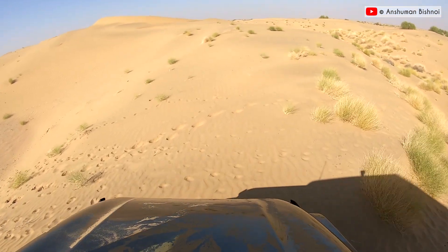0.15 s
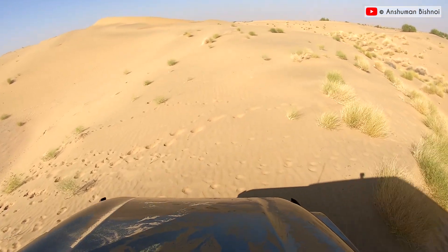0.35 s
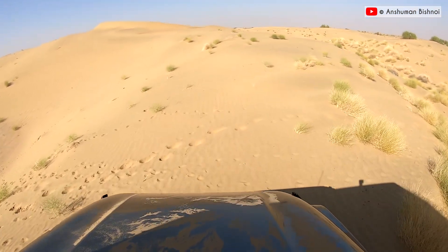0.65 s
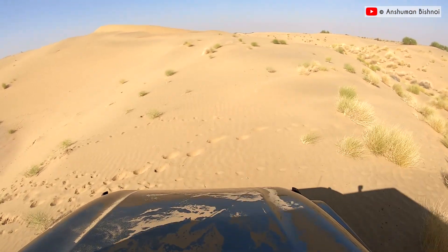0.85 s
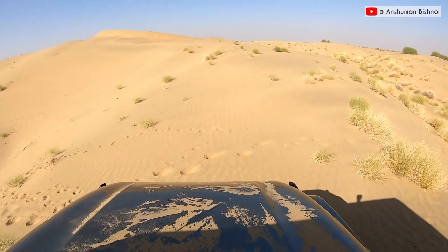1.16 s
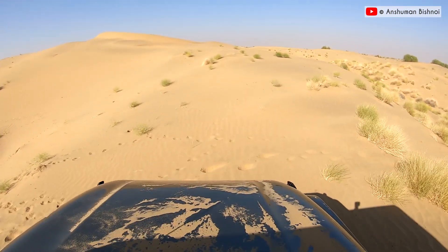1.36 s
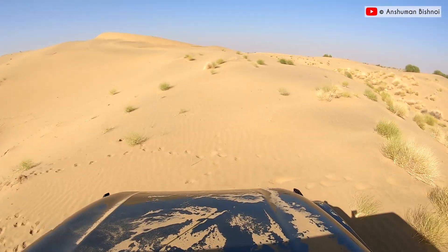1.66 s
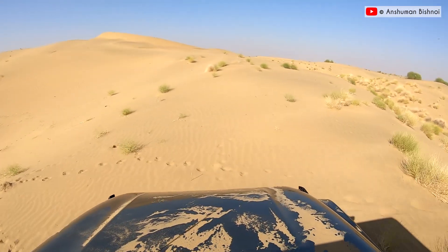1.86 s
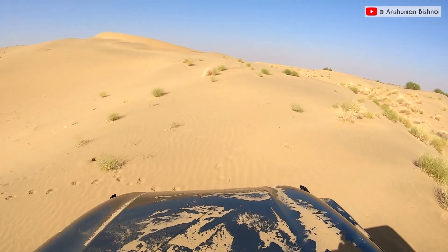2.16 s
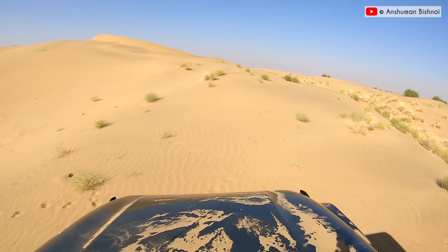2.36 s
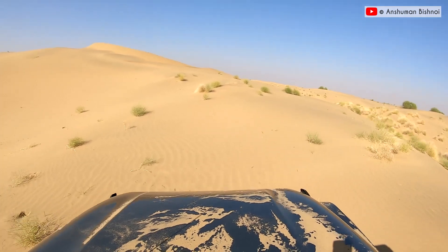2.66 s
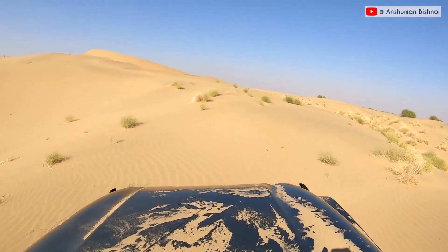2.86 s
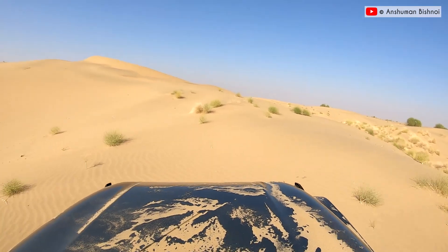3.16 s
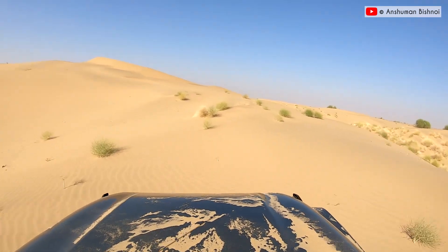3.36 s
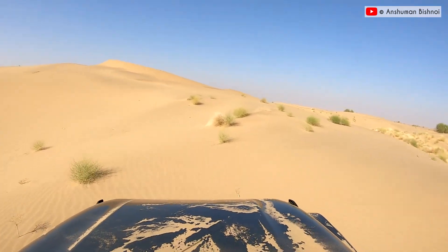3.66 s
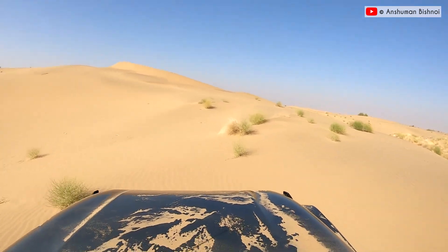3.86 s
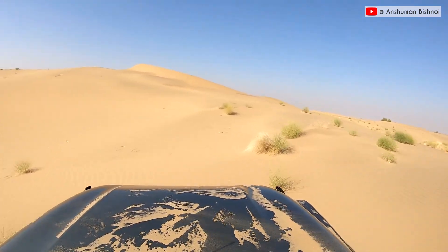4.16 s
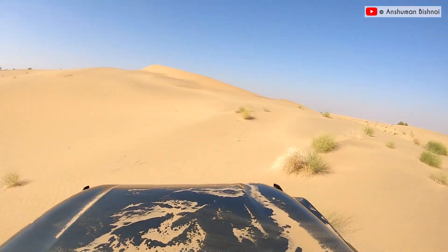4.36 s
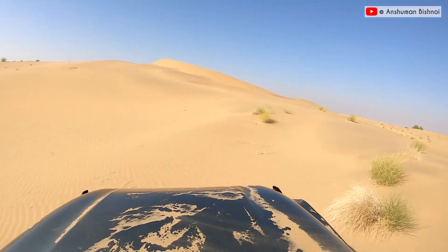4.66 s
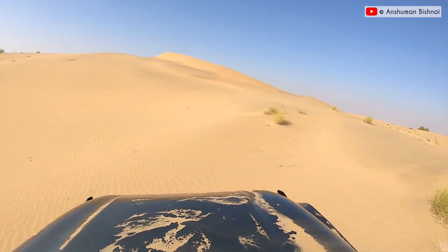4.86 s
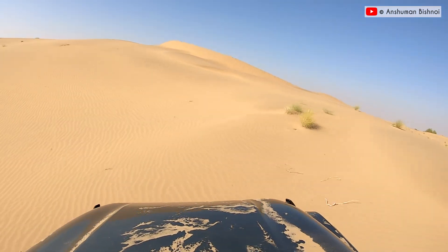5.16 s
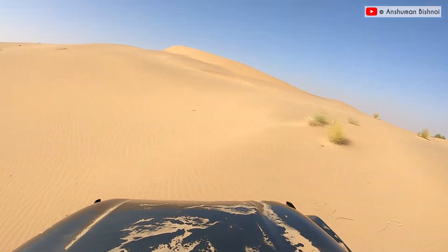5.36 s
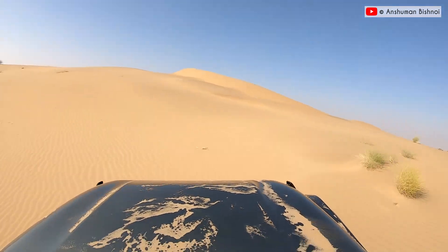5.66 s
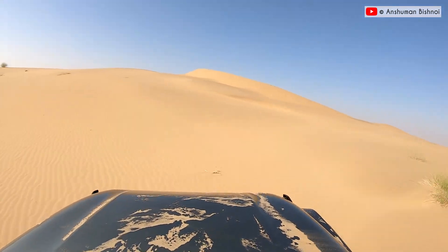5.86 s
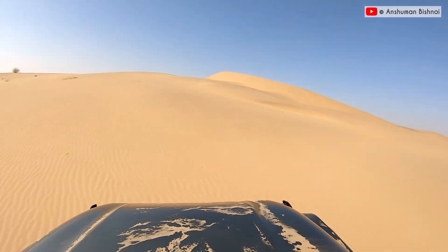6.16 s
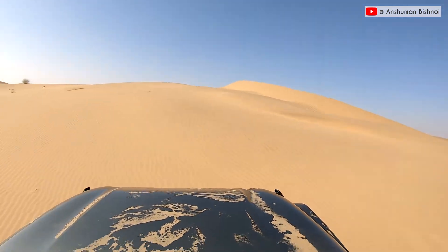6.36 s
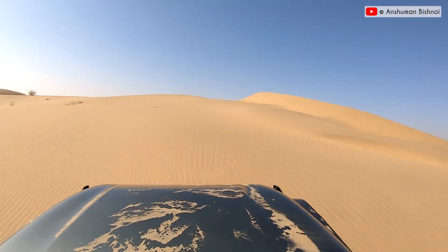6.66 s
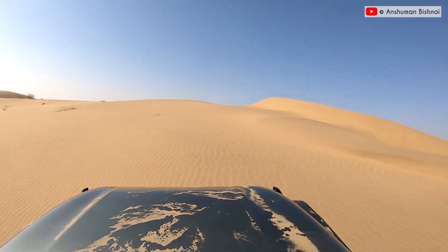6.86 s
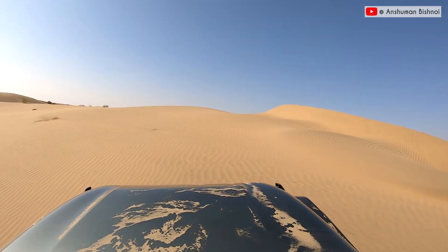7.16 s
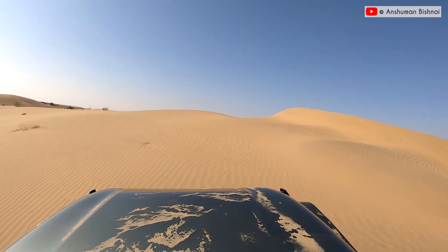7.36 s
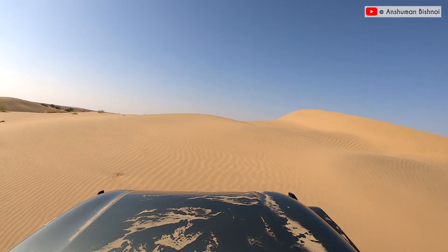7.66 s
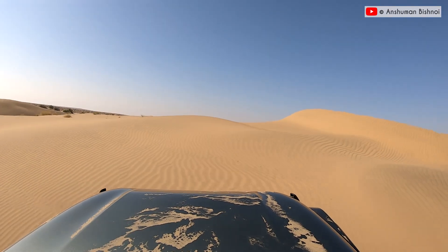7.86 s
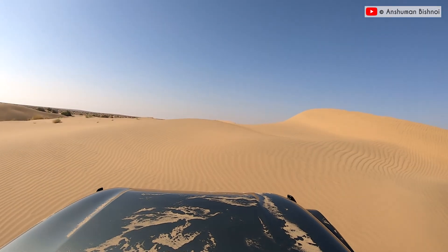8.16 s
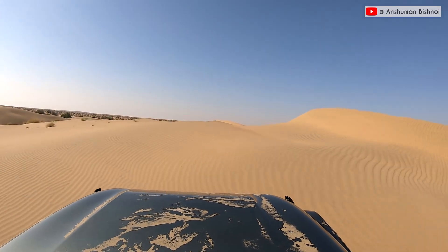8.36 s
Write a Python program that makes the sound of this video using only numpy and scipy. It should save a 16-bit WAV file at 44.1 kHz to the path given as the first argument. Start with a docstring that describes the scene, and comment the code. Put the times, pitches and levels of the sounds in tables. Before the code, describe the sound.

A four-cylinder diesel off-roader idles with a low throb and light ticking while gusts of wind thump a microphone on its roof. At about 1.6 seconds the engine starts to rev, rising steadily in pitch until about 4 seconds. It knocks and clatters under load, most strongly between 3 and 4 seconds, with a faint rasp and turbo hiss. The low exhaust drone then stays high, swelling and dipping as the vehicle pulls through soft sand. From about 3.4 seconds the wind buffets much harder, adding low slaps, short snaps and a few faint ticks of sand grains. After 5 seconds the clatter gives way to rushing wind and sand spray, with one brief swoosh of sand near 6.7 seconds. From 7 seconds the revs drop and the drone fades, while strong gusts continue until the end at about 8.5 seconds.

```python
"""A diesel idles under gusts of wind, then the four-cylinder off-roader revs up and pulls across soft dunes.
The exhaust drones at the firing rate, combustion blows ring the block, the engine clatters and the intake
hisses as the turbo spools up. Turbulent eddies buffet a microphone on the roof, harder as the car gathers
speed, and after 5 s the clatter gives way to rushing wind and sand spray.
Faint high ticks come from stray tappet strikes at idle, later from sand grains."""
import sys
import numpy as np
from scipy import signal
from scipy.fft import rfft, irfft, next_fast_len
from scipy.io import wavfile
from scipy.ndimage import uniform_filter1d, map_coordinates

SR = 44100
rng = np.random.default_rng(int(sys.argv[2]) if len(sys.argv) > 2 else 0)


def log_audio(samples):
    """Write samples as a 16-bit WAV file to the path given in sys.argv[1]."""
    # one column per channel
    frames = np.atleast_2d(samples).T
    # limit to full scale, then quantise
    limited = np.clip(frames, -1, 1)
    pcm = np.round(limited * 32767).astype(np.int16)
    wavfile.write(sys.argv[1], SR, pcm)


N = 375732

# engine speed as firing rate: t/s, f/Hz
FIRING_RATE = [(0, 26.9), (.6, 26.9), (1, 29), (1.45, 29), (1.6, 33), (1.78, 40.6), (2.2, 56.6),
               (2.38, 61.5), (2.71, 75), (2.93, 84.6), (3.25, 97.5), (3.4, 102.3), (3.62, 105.5),
               (3.8, 111.3), (3.95, 112.7), (4.22, 113), (4.32, 114.5), (5.1, 126.7), (5.35, 119.7),
               (5.69, 122.7), (5.99, 116.5), (6.35, 125.5), (6.65, 129.5), (6.9, 128), (7.05, 124),
               (7.6, 98), (8.52, 66)]
# exhaust pipe response, booming near 115 and 205 Hz: f/Hz, level/dB
PIPE_RESPONSE = [(27, -39.5), (57, -28), (89.5, -37), (92.5, -20), (113, -20), (130, -19.5), (170, -16),
                 (186, -16.5), (205, -6.5), (226, -21), (260, -24)]
# exhaust overtones: multiple of the firing rate, gain/dB
HARMONICS = [(2, -21), (3, -27), (4, -29)]
# the drone swells under load and breaks up as the wheels slip: t/s, gain/dB, unsteadiness/dB
DRONE_SWELL = [(0, -1, 3.5), (3.1, -1, -0.5), (3.6, -1.5, 0.5), (3.9, 3, 0), (4.45, 0, 3.5),
               (4.6, -8.5, 7.5), (4.8, 1, 1.5), (5.1, 0.5, 1), (5.3, -6, -0.5), (5.5, -1, 2.5),
               (5.66, -0.5, 3), (5.8, -8.5, 2), (5.95, 2, 0), (6.28, -3, 7), (6.4, -6, -2), (6.58, 2, 2.5),
               (6.73, -5.5, -6), (6.85, -0.5, 0.5), (7.05, -3, 6), (7.3, -9.5, 4.5), (8.52, -14, 1)]
# relative blow of each cylinder; alternate ones twist the block the other way
CYLINDER_BLOWS = [1, -.3, .75, -.2]
# engine load, heard as knock: t/s, block level/dB, head level/dB
LOAD = [(0, -51, -54), (1, -52, -54), (1.62, -52, -54), (1.72, -41, -53), (2.3, -37.5, -50),
        (2.7, -36, -45), (3.1, -34.5, -38.5), (3.5, -32, -38.5), (3.75, -35.5, -37), (4.32, -35.5, -39),
        (4.42, -46, -41), (5, -47, -43), (5.3, -52, -54), (8.52, -60, -68)]
# modes of the block, and of the head and covers: f/Hz, width/Hz, gain/dB
BLOCK_MODES = [(220, 40, -4), (445, 45, -2), (510, 30, -3), (565, 24, -1), (636, 24, 8), (780, 50, -19)]
HEAD_MODES = [(1000, 40, -7), (1155, 55, 2.5), (1425, 60, -1), (1705, 45, 0), (2240, 60, -6),
              (2920, 70, -6)]
# mid-range noise, engine clatter at first, then rushing wind and sand spray after 5 s: t/s, level/dB
MID_NOISE_LEVEL = [(0, -46), (1.58, -44.5), (2.35, -40.5), (3.13, -34.5), (4.05, -41), (5.08, -36.5),
                   (5.34, -40), (6.6, -37), (7.06, -40), (7.56, -40.5), (7.66, -46), (8.12, -50),
                   (8.52, -45)]
# relative size of the tappet tick at each cylinder
TAPPET_SIZES = [1, .25, .7, .9]
# modes of the tappet, and of the cover that swells after it: f/Hz, width/Hz, gain/dB
TAPPET_MODES = [(3000, 500, -21), (3800, 130, -4), (7400, 350, -10)]
COVER_MODES = [(1410, 110, 0), (1900, 220, -7)]
# wind on the microphone port: t/s, strength re cruising/dB, flutter level/dB
WIND_LEVEL = [(0, -25.5, -41.5), (1.3, -19, -37.5), (1.8, -11.5, -36), (2.6, -9.5, -33.5), (3.4, 0.5, -30),
              (3.9, -0.5, -40), (4.6, 2, -24.5), (5.35, -1, -27), (5.55, -2, -24), (6.4, 1.5, -24),
              (6.98, 3, -20.5), (7.15, 1.5, -22.5), (7.45, 5.5, -20), (7.62, -0.5, -23.5), (7.8, 3.5, -18),
              (7.93, -2.5, -25), (8.25, -6, -24.5), (8.38, 0.5, -22.5), (8.52, -2.5, -25)]
# gusts: t/s, length/s, buffet level/dB, flutter level/dB
GUSTS = [(0.17, 0.097, -21.5, -26), (0.345, 0.097, -21, -26.5), (0.47, 0.21, -25.5, -29),
         (0.695, 0.27, -23.5, -29), (1.08, 0.14, -24.5, -32), (1.3, 0.12, -25.5, -40.5),
         (1.472, 0.18, -23.5, -31), (2.098, 0.23, -27, -32), (2.393, 0.088, -23, -42),
         (3.142, 0.18, -25, -25), (5.195, 0.21, -16, -32)]
# air hiss over the roof: t/s, level/dB
AIR_LEVEL = [(0, -81.5), (1.75, -83), (1.95, -72.5), (3.1, -59.5), (4.0, -64), (4.7, -54), (5.25, -57.5),
             (5.4, -60), (5.6, -57.5), (5.7, -54.5), (6.6, -52.5), (7.05, -56), (7.48, -54), (7.91, -58.5),
             (8.52, -58)]
# spectra of the mid-range noise, wind and intake: f/Hz, relative density/dB
MID_NOISE_SPECTRUM = [(250, -42), (500, -5), (640, -10), (750, -9.5), (1280, -11.5), (1410, -10.5),
                      (1880, -13), (3000, -21), (3700, -25), (4200, -36.5), (5300, -42.5), (6300, -51.5),
                      (7500, -46.5), (8600, -58), (9500, -63.5), (13000, -83)]
BUFFET_SPECTRUM = [(12, -35), (22, -8), (40, 5), (97, 4.5), (140, -5), (195, -8), (300, -19.5),
                   (390, -36.5), (660, -120)]
FLUTTER_SPECTRUM = [(65, -18.5), (120, -1), (200, -7), (300, -12), (450, -29.5), (900, -54.5), (3000, -120)]
ROAR_SPECTRUM = [(150, -25.5), (300, 0.5), (520, -4), (800, -12), (1200, -15.5), (2500, -36.5),
                 (4000, -48.5), (9000, -120)]
AIR_SPECTRUM = [(1500, -9.5), (3000, 9.5), (4200, 8), (5500, 4.5), (6900, 1), (7500, -2), (8300, 2),
                (8800, -2), (9300, -10.5), (10200, -8.5), (10800, -18.5), (12300, -30.5), (13200, -48)]
RASP_SPECTRUM = [(2000, -24), (2800, 0), (3200, -3), (3700, -9), (4500, -15.5), (9000, -120)]
INTAKE_SPECTRUM = [(3600, -21.5), (4900, 5.5), (5300, -16.5), (5900, -5.5), (6900, 0.5), (7500, -3.5),
                   (8800, -14.5), (9300, -18), (11500, -21.5), (13000, -32)]
# faint high ticks, stray tappet ticks at idle, later sand grains: t/s, strength/dB, f/Hz
HIGH_TICKS = [(0.1186, -55, 7400), (0.168, -43, 8200), (0.8395, -64, 7400), (1.1787, -60, 7070),
              (1.244, -53, 7830), (1.292, -61, 7420), (1.5184, -59, 7070), (1.7634, -58, 7600),
              (3.2912, -41, 7700), (4.1087, -51, 7600), (4.246, -42, 7900), (4.4582, -51, 9200),
              (4.7142, -54, 9900), (4.7725, -50, 9600), (4.8304, -50, 9400), (4.954, -36, 4700),
              (6.27, -38, 5000)]
# single eddies slapping the port: t/s, strength/dB, f/Hz
EDDY_SLAPS = [(0.209, -10, 121), (0.284, -8, 120), (0.379, -16, 122), (0.565, -8.5, 70), (0.759, -8.5, 144),
              (0.853, -14, 179), (0.917, -14, 76), (0.957, -7, 77), (1.141, -15.5, 192), (1.379, -15, 64),
              (5.59, -14, 164), (6.001, -11, 116), (6.048, -7.5, 79), (6.104, -10, 126), (7.433, -5.5, 200),
              (7.573, -9, 75), (8.019, -10, 61.9), (8.301, -10.5, 183), (8.389, -4.5, 75.4)]
# short snaps on top of the wind: t/s, strength/dB, f/Hz
WIND_SNAPS = [(4.269, -17, 517), (4.342, -17.5, 670), (4.41, -21, 541), (4.959, -17, 534),
              (4.996, -15, 441), (5.367, -19.5, 536), (5.474, -22, 444), (5.59, -24, 587),
              (5.668, -18, 400), (6.002, -19, 568), (6.046, -22, 580), (6.106, -19, 530), (6.934, -19, 441),
              (7.573, -18.5, 535), (7.934, -26, 861), (8.018, -21, 444), (8.386, -19.5, 443)]

UNEVEN_HZ = (93, 105)  # the cylinders' blows grow unequal between these firing rates
GEAR_TEETH, GEAR_HZ, GEAR_WIDTH_HZ = 36.5, 2935, 70  # teeth meshing per firing; gear cover resonance
TIME = np.arange(N) / SR


def amp(db):
    """Amplitude ratio of a level in dB."""
    return 10 ** (np.asarray(db) / 20)


def unit(x):
    """x scaled to rms 1."""
    return x / np.sqrt(np.mean(x ** 2) + 1e-20)


def curves(rows):
    """Linear interpolation: one value per sample for each column after the time."""
    times, *columns = np.transpose(rows)
    return [np.interp(TIME, times, column) for column in columns]


def wobble(rate):
    """A smooth random curve, rate knots a second."""
    return map_coordinates(rng.standard_normal(int(N * rate / SR) + 4), [TIME * rate])


def filtered(x, response):
    """Linear filtering: the spectrum of x times a frequency response."""
    size = next_fast_len(N + SR // 2)
    return irfft(rfft(x, size) * response(np.fft.rfftfreq(size, 1 / SR)), size)[..., :N]


def coloured(x, spectrum):
    """x shaped by (f/Hz, level/dB) points on a log frequency axis, rms 1."""
    f, db = np.transpose(spectrum)
    return unit(filtered(x, lambda hz: amp(np.interp(np.log(hz + 1), np.log(f + 1), db))))


def patchy(spread_db):
    """White noise with patches of random gain in time and frequency."""
    cells = signal.stft(rng.standard_normal(N), nperseg=512)[2]
    field = uniform_filter1d(rng.standard_normal(cells.shape), size=6, axis=0)
    field = uniform_filter1d(field, size=8, axis=1)
    return signal.istft(cells * amp(spread_db * unit(field)), nperseg=512)[1][:N]


def lagged(x, lag_s):
    """First-order relaxation towards x."""
    keep = np.exp(-1 / (lag_s * SR))
    return signal.lfilter([1 - keep], [1, -keep], x)


def resonances(f, modes):
    """Modal superposition: the response of damped oscillators, summed with alternating sign."""
    return sum((-1) ** k * amp(db) * 1j * f * width / (hz * hz - f * f + 1j * f * width)
               for k, (hz, width, db) in enumerate(modes))


def ringing(x, modes):
    """Resonance, absorption and dispersion: x rings the modes and leaves the engine bay, rms 1."""
    delays_s = rng.uniform(0, .024, 400)  # each 60 Hz band leaves by a path of its own length

    def response(f):
        lining = 1 / (1 + 1j * f / 4000) ** 6  # soaks up the treble
        lag_cycles = np.cumsum(np.interp(f / 60, np.arange(400), delays_s)) * f[1]
        return resonances(f, modes) * lining * np.exp(-2j * np.pi * lag_cycles)
    return unit(filtered(x, response))


def exhaust(firings, rate_hz, slip_rad_per_db=.2):
    """Forced vibration: the pipe sounds the firing rate and its harmonics, wavering in level and phase."""
    hz, db = np.transpose(PIPE_RESPONSE)
    swell_db, waver_db = curves(DRONE_SWELL)
    strength = amp(np.interp(rate_hz, hz, db) + waver_db * wobble(22))
    drone = strength * np.sin(2 * np.pi * firings + slip_rad_per_db * waver_db * wobble(25))
    for k, gain_db in HARMONICS:
        level_db = np.interp(k * rate_hz, hz, db) + gain_db + waver_db * wobble(9.6)
        drone += amp(level_db) * np.sin(2 * np.pi * k * firings)
    return np.sqrt(2) * amp(swell_db) * drone


def knock(firings, rate_hz):
    """Impulse excitation: one combustion blow per firing rings the modes of block and head."""
    beats = np.arange(1, int(firings[-1]))
    jitter, scatter = rng.standard_normal((len(beats), 2)).T
    at = np.interp(beats, firings, np.arange(N)) + SR * .00005 * jitter
    uneven = np.interp(np.interp(beats, firings, rate_hz), UNEVEN_HZ, [.12, 1])
    cylinder = np.take(CYLINDER_BLOWS, beats % len(CYLINDER_BLOWS))
    size = (.64 + uneven * (cylinder - .64)) * amp(2 * scatter)
    taps = np.floor(at)[:, None] + np.arange(-7, 9)
    offset = taps - at[:, None]
    pulse = np.sinc(offset) * np.cos(np.pi * offset / 16) ** 2  # places a blow between samples
    blows = np.bincount(np.clip(taps, 0, N - 1).astype(int).ravel(), (size[:, None] * pulse).ravel(), N)
    blows /= np.sqrt(np.gradient(firings) * SR)  # power independent of the firing rate
    block_db, head_db = curves(LOAD)
    growl = amp(-42 - 13.5 * TIME) * rng.standard_normal(N)  # the block growls at first and settles
    noise_share = np.interp(rate_hz, UNEVEN_HZ, [.15, .03])
    block_force = np.sqrt(1 - noise_share) * unit(blows) + np.sqrt(noise_share) * rng.standard_normal(N)
    head_force = amp(1.2 * wobble(9)) * blows
    return (np.std(growl) * ringing(growl, BLOCK_MODES)
            + amp(block_db) * ringing(block_force, BLOCK_MODES)
            + amp(head_db) * ringing(head_force, HEAD_MODES))


def mid_noise(firings, rate_hz):
    """Amplitude-modulated noise: engine clatter at first, then rushing wind and sand spray after 5 s."""
    depth_db = 2.6 * np.clip(30 / rate_hz, 0, 1) ** 1.3  # the beat is distinct at idle, blurred at speed
    beat_db = depth_db * (np.cos(2 * np.pi * firings) + .14 * np.cos(np.pi * firings))
    noise = amp(beat_db + .36 * wobble(16)) * patchy(spread_db=.5)
    return amp(curves(MID_NOISE_LEVEL)[0] + sand_spray_db()) * coloured(noise, MID_NOISE_SPECTRUM)


def tappets(firings, idle_hz, lead_firings=.12):
    """Impact ringing: at idle one dry tick a firing rings tappet and cover, three firm and one weak."""
    beats = np.arange(1, int(firings[-1]))
    at = np.searchsorted(firings, beats - lead_firings)
    level_db = -48.5 - 12 * np.maximum(at / SR - .6, 0)  # fades after 0.6 s
    level_db += .69 * rng.standard_normal(len(beats))
    blows = np.zeros(N)
    blows[at] = np.take(TAPPET_SIZES, beats % len(TAPPET_SIZES)) * amp(level_db)

    def response(f):
        cover = sum(amp(db) * resonances(f, [(hz, width, 0)]) ** 2 for hz, width, db in COVER_MODES)
        return (resonances(f, TAPPET_MODES) + cover) / (1 + 1j * f / 4500) ** 6  # dulls the treble
    one_tick = filtered(signal.unit_impulse(N), response)[:SR]
    return filtered(blows, response) / np.sqrt(np.mean(one_tick ** 2) * idle_hz)


def wind():
    """Turbulence: eddies of three sizes buffet, flutter and roar on the port; air hisses over the roof."""
    wind_db, flutter_db = curves(WIND_LEVEL)
    buffet_gain, flutter_gain = amp(-21 + .66 * wind_db), amp(flutter_db)
    for start, length, gust_buffet_db, gust_flutter_db in GUSTS:
        inside_s = np.minimum(TIME - start, start + length - TIME)
        gust = np.clip(inside_s / .067 + .5, 0, 1)  # straight 67 ms edges
        buffet_gain = np.maximum(buffet_gain, amp(gust_buffet_db) * gust)
        flutter_gain = np.maximum(flutter_gain, amp(gust_flutter_db) * gust)
    opening_roar = amp(-34.5 - 7.5 * TIME)
    roar_gain = np.hypot(amp(-31 + wind_db), opening_roar)
    air_gain = amp(curves(AIR_LEVEL)[0] + sand_spray_db())
    eddies = wobble(22)
    buffet = coloured(amp(1.2 * eddies) * rng.standard_normal(N), BUFFET_SPECTRUM)
    flutter = coloured(amp(eddies + 2.3 * wobble(45)) * rng.standard_normal(N), FLUTTER_SPECTRUM)
    roar = coloured(amp(.27 * eddies + 2.4 * wobble(60)) * rng.standard_normal(N), ROAR_SPECTRUM)
    air = coloured(amp(.66 * eddies + .35 * wobble(6)) * patchy(spread_db=1.5), AIR_SPECTRUM)
    return buffet_gain * buffet + flutter_gain * flutter + roar_gain * roar + air_gain * air


def high_ticks(tick_t60_s=.0065, ring_t60_s=.12, ring_hz=8400):
    """Free vibration after impact: stray tappet ticks at idle, later sand grains, each with a faint ring."""
    out, t = np.zeros(N + SR), np.arange(SR // 10) / SR
    attack = 1 - np.exp(-t / .0001)
    ring = amp(-24.5 - 60 * t / ring_t60_s) * np.sin(2 * np.pi * ring_hz * t)
    for start, db, hz in HIGH_TICKS:
        tick = amp(-60 * t / tick_t60_s) * np.sin(2 * np.pi * hz * t)
        out[round(start * SR):][:len(t)] += amp(db) * (tick + ring) * attack
    return out[:N]


def slaps(push_t60_s=.054, puff_t60_s=.01):
    """Pressure transient: an eddy pushes the diaphragm for a few cycles, with a short puff on top."""
    out, t = np.zeros(N + SR), np.arange(SR // 10) / SR
    lowpass = signal.butter(4, 900, fs=SR, output="sos")
    attack = (1 - np.exp(-t / .0009)) ** 2
    for start, db, hz in EDDY_SLAPS:
        push = -np.sin(2 * np.pi * hz * t) * amp(-60 * t / push_t60_s) * attack
        puff = signal.sosfilt(lowpass, rng.standard_normal(len(t)) * amp(-60 * t / puff_t60_s))
        out[round(start * SR):][:len(t)] += amp(db) * (push + .42 * puff)
    return out[:N]


def intake(spool_s=.27, full_drive_db=-40):
    """Flow noise: a rasp, then a hiss, build as the turbo's boost lags behind the load."""
    load_db = curves(LOAD)[0]
    boost_db = lagged(np.minimum(load_db, full_drive_db) - load_db[0], spool_s)
    rasp_db = np.minimum(load_db[0] + boost_db - 6, -50)
    hiss_db = -62 + 1.9 * (boost_db - boost_db.max())
    rasp = coloured(amp(.59 * wobble(22)) * patchy(spread_db=1.5), RASP_SPECTRUM)
    hiss = coloured(amp(.8 * wobble(16)) * patchy(spread_db=1.5), INTAKE_SPECTRUM)
    return amp(rasp_db) * rasp + amp(hiss_db) * hiss


def gear(firings, rate_hz):
    """Resonance: the mesh tone sounds as it sweeps through the cover's mode, and leaves it buzzing."""
    head_db = curves(LOAD)[1]
    detuning = (GEAR_TEETH * rate_hz - GEAR_HZ) / GEAR_WIDTH_HZ
    excitation = amp(head_db + 2) * np.exp(-detuning ** 2)
    mesh = np.sin(2 * np.pi * GEAR_TEETH * firings)
    buzz_mode = [(GEAR_HZ, 2 * GEAR_WIDTH_HZ, 0)]
    buzz = unit(filtered(rng.standard_normal(N), lambda f: resonances(f, buzz_mode) ** 2))
    return excitation * mesh + amp(7) * lagged(excitation, lag_s=.3) * buzz


def snaps(t60_s=.02):
    """Damped oscillation: each snap is a few cycles of ring under a burst of dull noise."""
    out, t = np.zeros(N + SR), np.arange(SR // 20) / SR
    lowpass = signal.butter(6, 1700, fs=SR, output="sos")
    for start, db, hz in WIND_SNAPS:
        burst = -np.sin(2 * np.pi * hz * t) + amp(-2.5) * rng.standard_normal(len(t))
        envelope = amp(db + 1.5 - 60 * t / t60_s)
        out[round(start * SR):][:len(t)] += signal.sosfilt(lowpass, envelope * burst)
    return out[:N]


def sand_spray_db(at_s=6.72, rise_s=.032, hold_s=.12, fall_s=.21, lift_db=5):
    """Gain envelope: one swoosh of thrown sand lifts the mid-range noise and the air hiss."""
    return np.interp(TIME - at_s, [-rise_s, 0, hold_s, hold_s + fall_s], [0, lift_db, lift_db, 0])


def scene():
    """Superposition: engine, wind and sand add in one channel; one crankshaft times the moving parts."""
    rate_hz = curves(FIRING_RATE)[0]
    firings = np.cumsum(rate_hz * (1 + .0012 * wobble(12))) / SR  # running count
    car = exhaust(firings, rate_hz) + knock(firings, rate_hz) + mid_noise(firings, rate_hz)
    car += tappets(firings, idle_hz=rate_hz[0]) + gear(firings, rate_hz) + intake()
    return (car + wind() + slaps() + snaps() + high_ticks())[None]


def record(dry, ceiling=.59, top_hz=13500):
    """Saturation and band limiting: the input stage rounds the tallest peaks and cuts the top treble."""
    soft = dry / (1 + np.abs(dry / ceiling) ** 4) ** (1 / 4)
    fade_in = np.minimum(TIME / .005, 1)
    return filtered(soft * fade_in, lambda hz: hz < top_hz)


dry = scene()
out = record(dry)
log_audio(out)
```